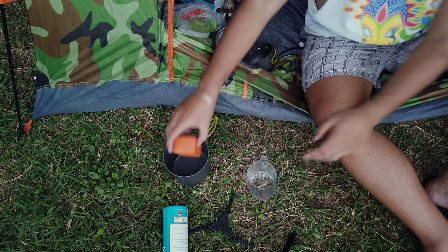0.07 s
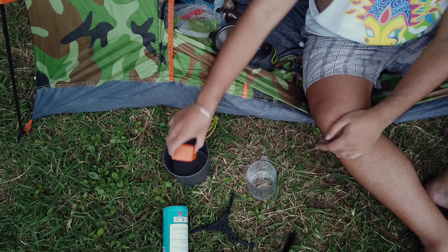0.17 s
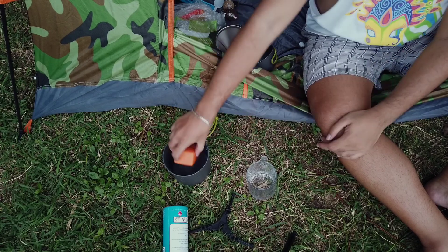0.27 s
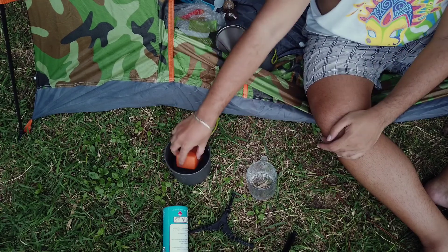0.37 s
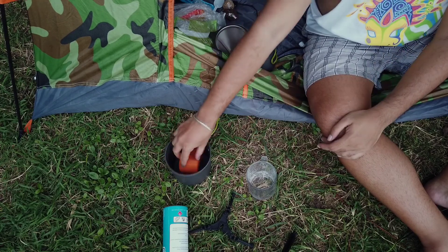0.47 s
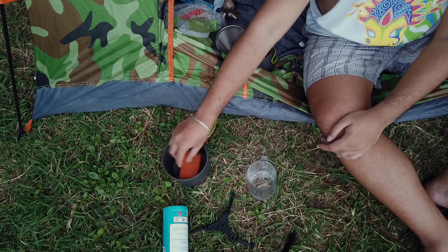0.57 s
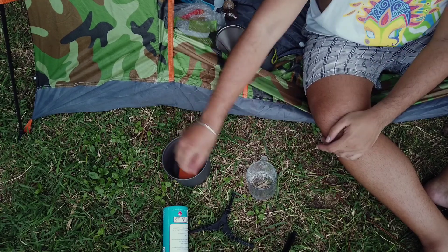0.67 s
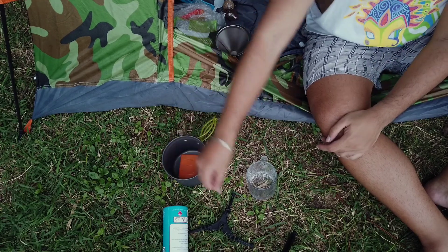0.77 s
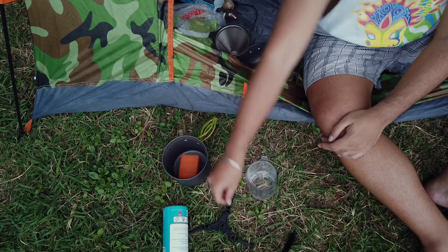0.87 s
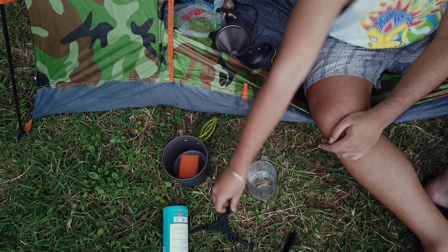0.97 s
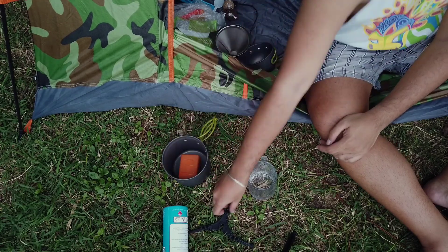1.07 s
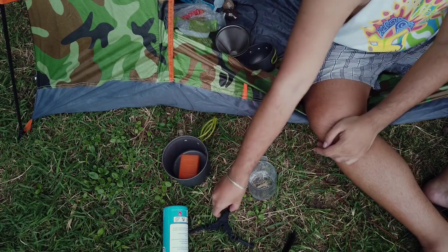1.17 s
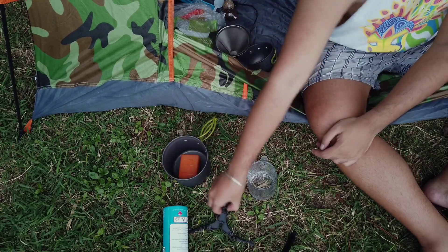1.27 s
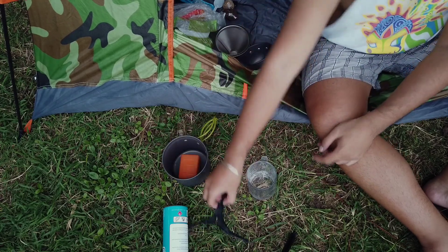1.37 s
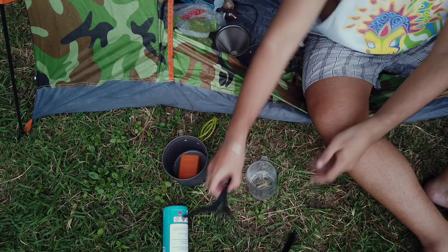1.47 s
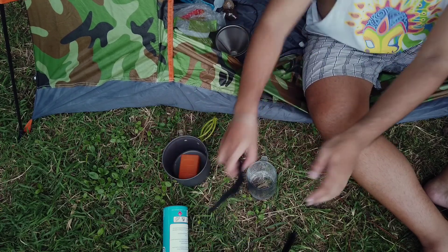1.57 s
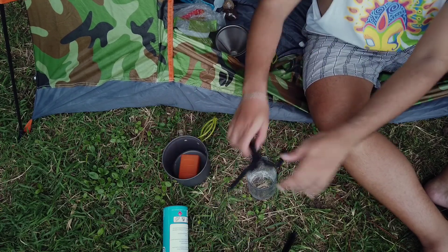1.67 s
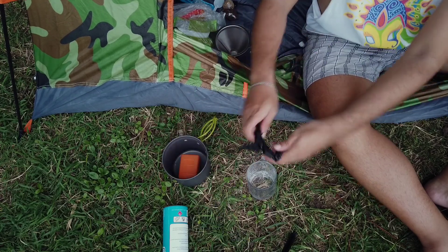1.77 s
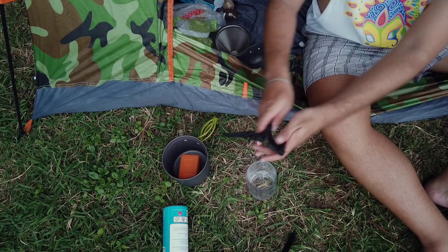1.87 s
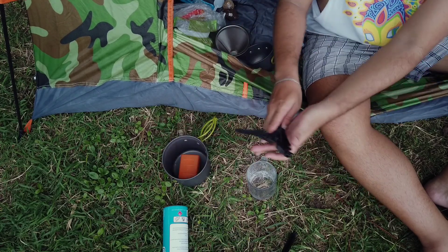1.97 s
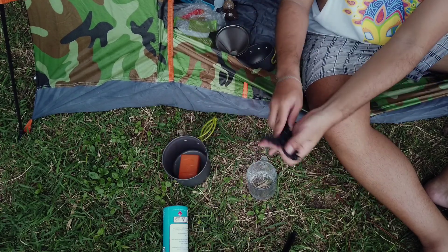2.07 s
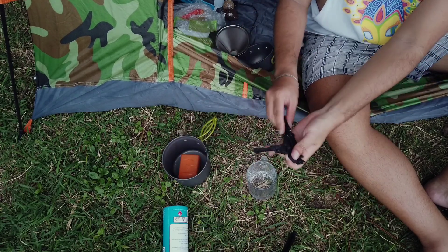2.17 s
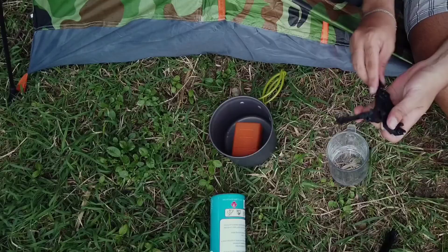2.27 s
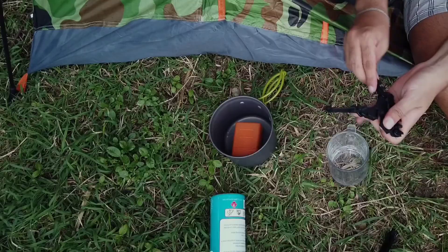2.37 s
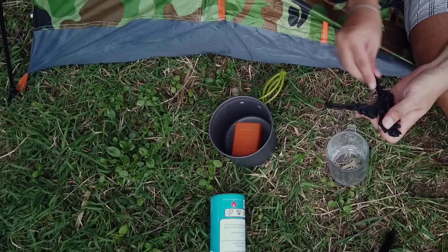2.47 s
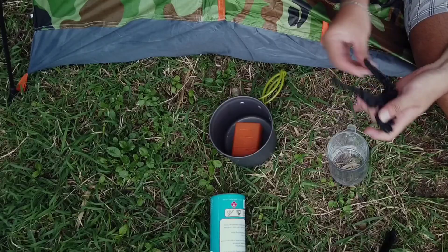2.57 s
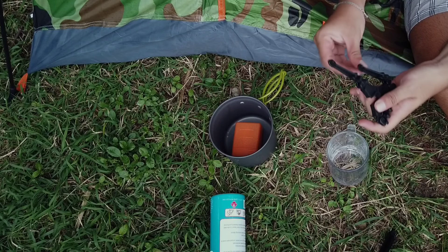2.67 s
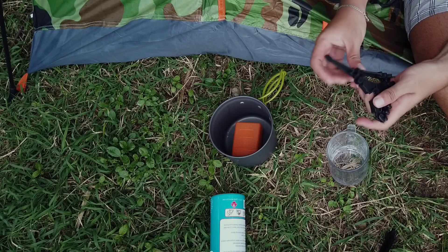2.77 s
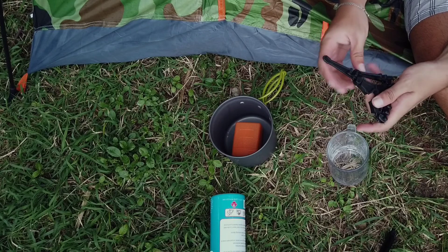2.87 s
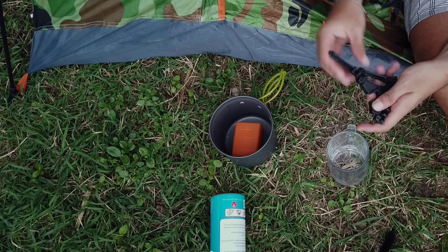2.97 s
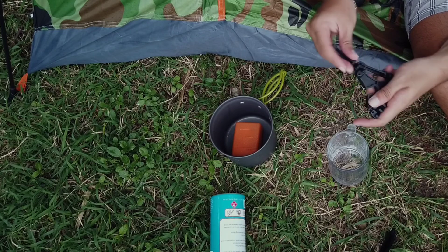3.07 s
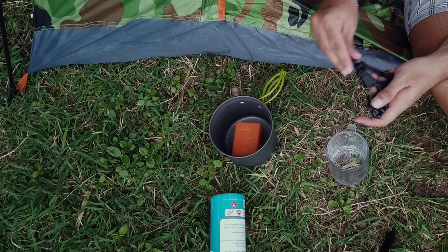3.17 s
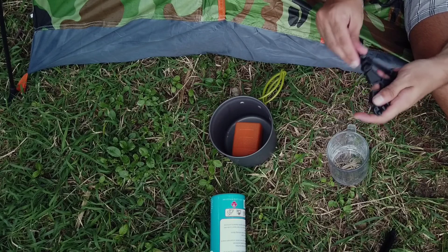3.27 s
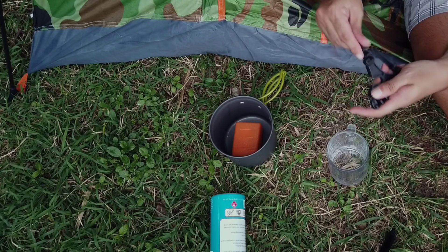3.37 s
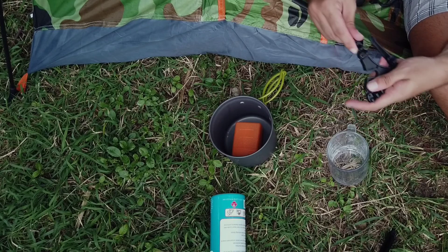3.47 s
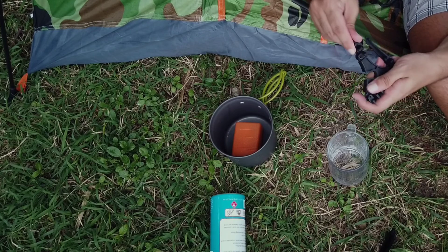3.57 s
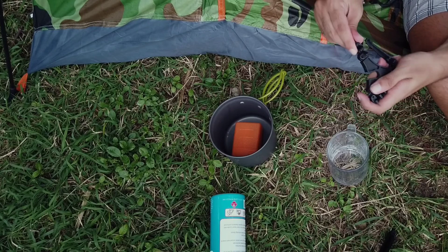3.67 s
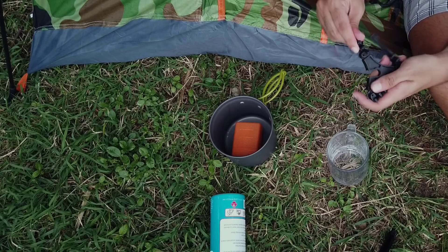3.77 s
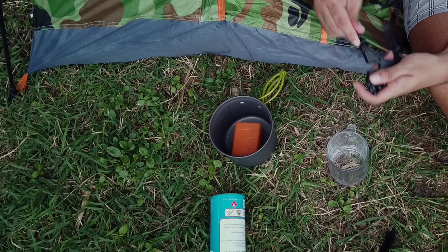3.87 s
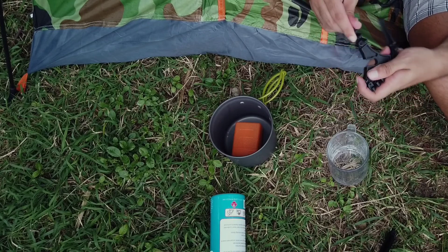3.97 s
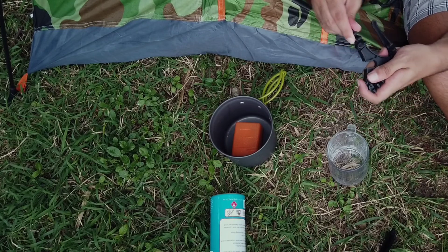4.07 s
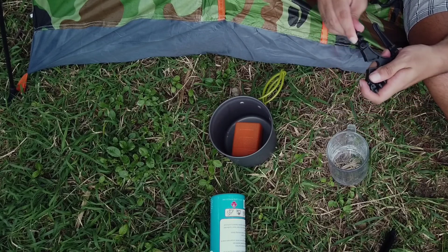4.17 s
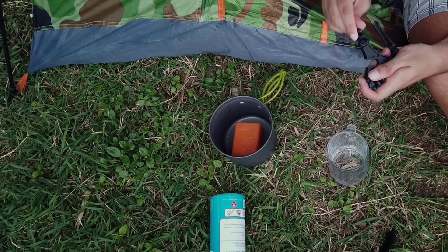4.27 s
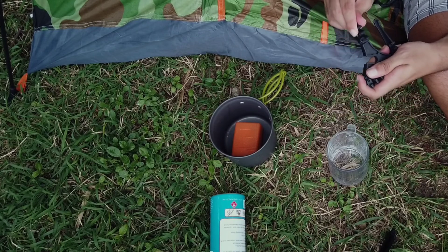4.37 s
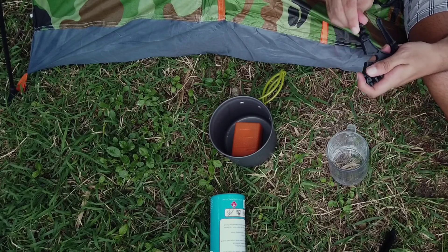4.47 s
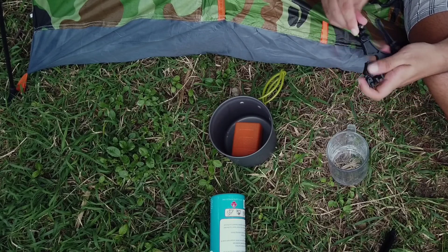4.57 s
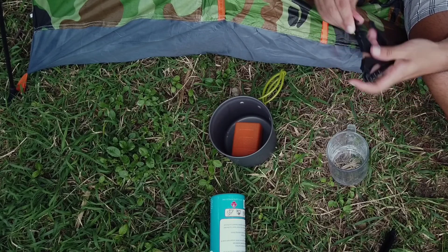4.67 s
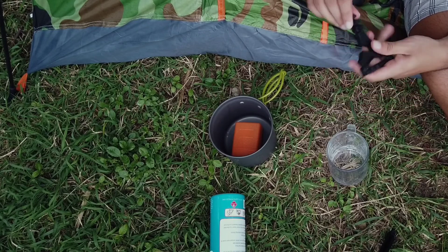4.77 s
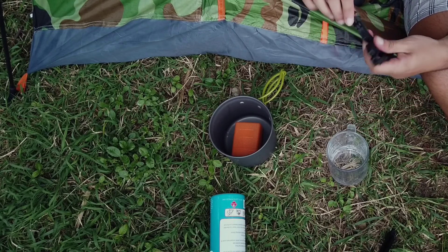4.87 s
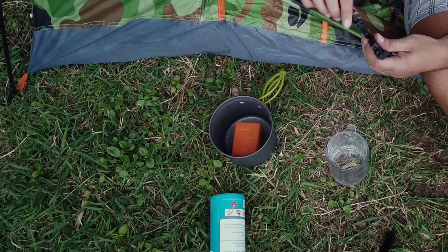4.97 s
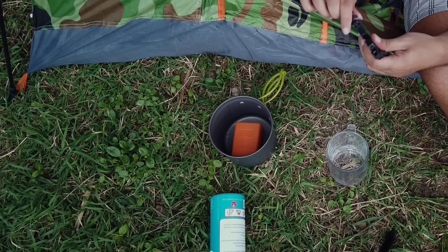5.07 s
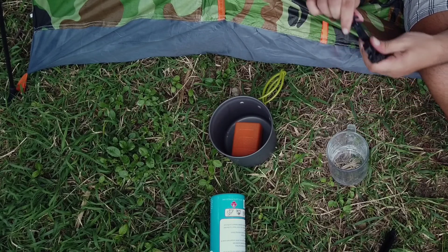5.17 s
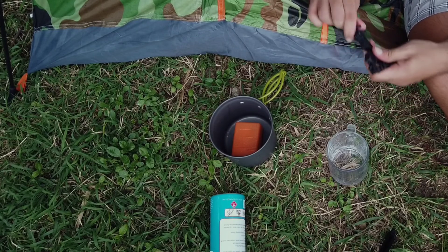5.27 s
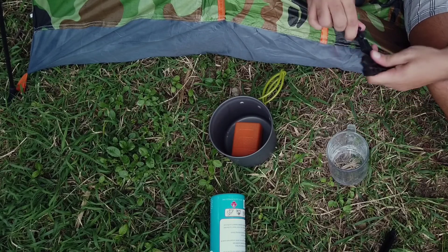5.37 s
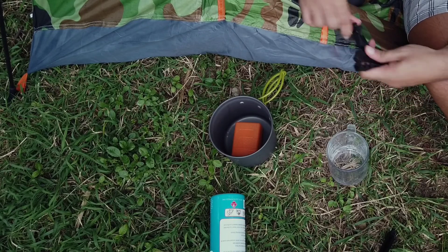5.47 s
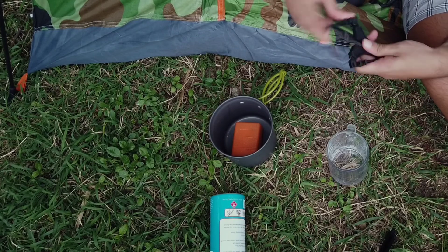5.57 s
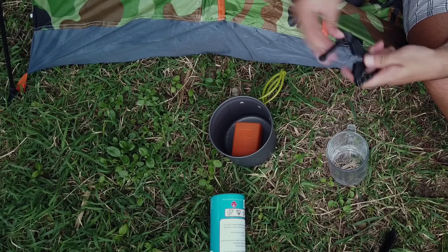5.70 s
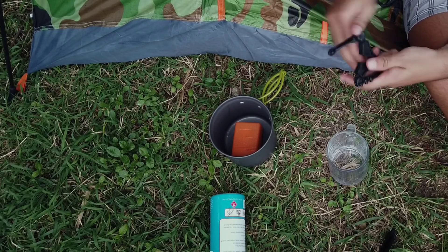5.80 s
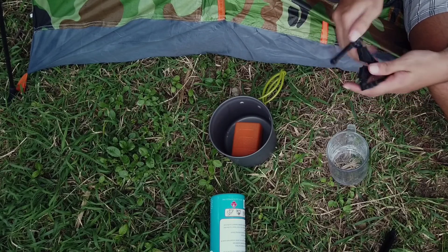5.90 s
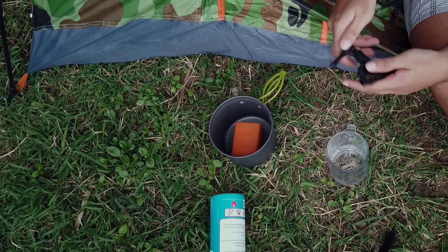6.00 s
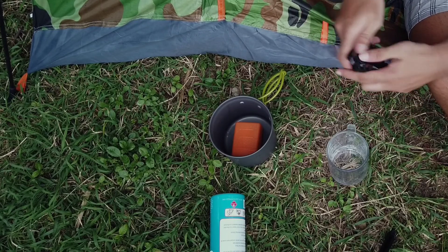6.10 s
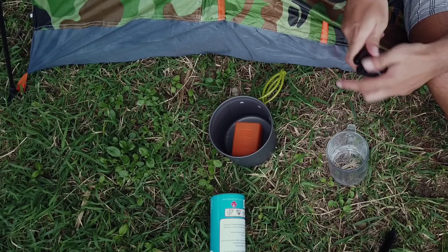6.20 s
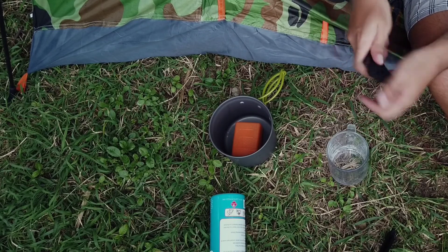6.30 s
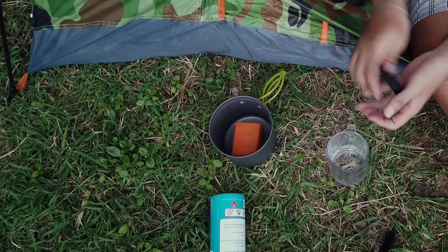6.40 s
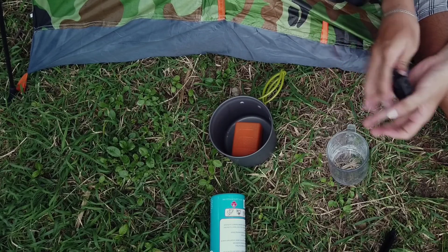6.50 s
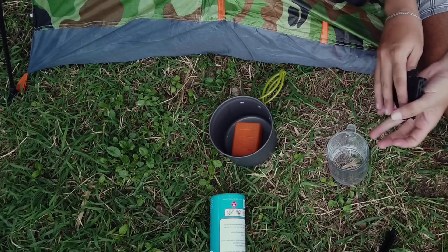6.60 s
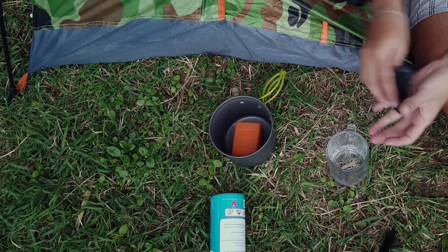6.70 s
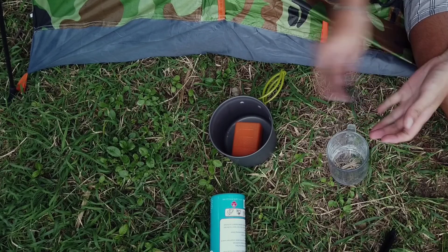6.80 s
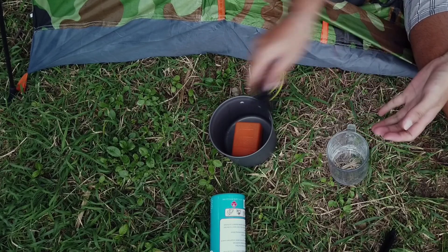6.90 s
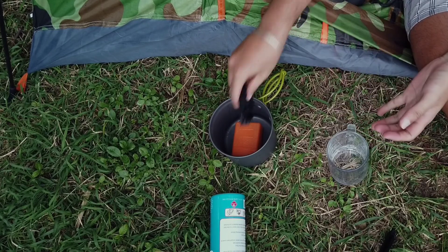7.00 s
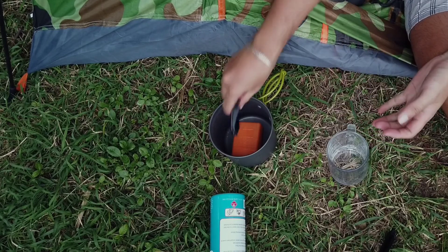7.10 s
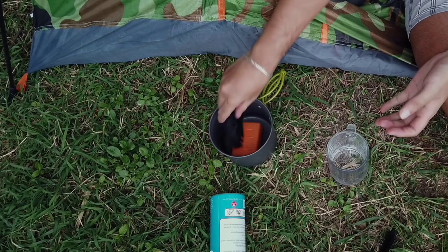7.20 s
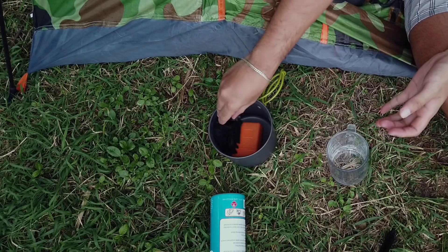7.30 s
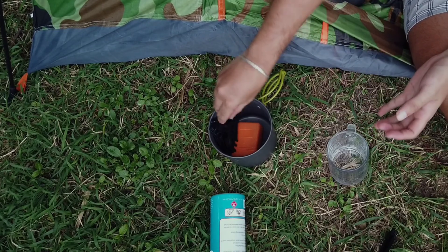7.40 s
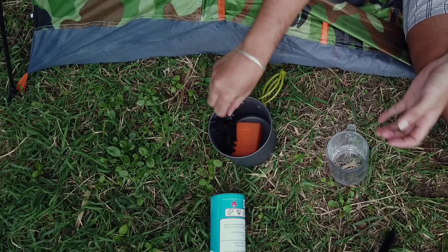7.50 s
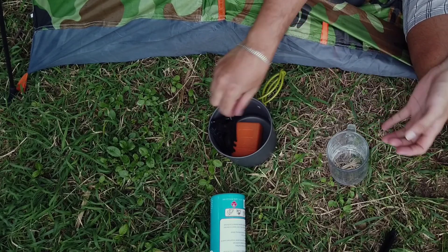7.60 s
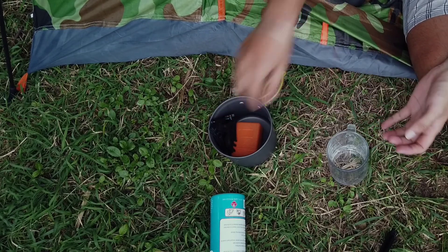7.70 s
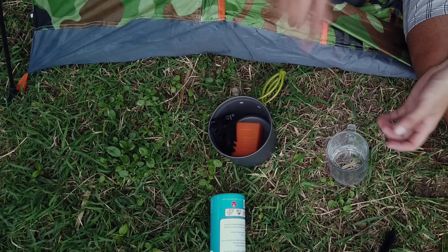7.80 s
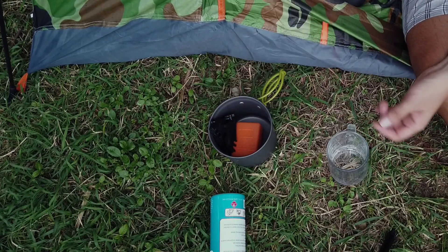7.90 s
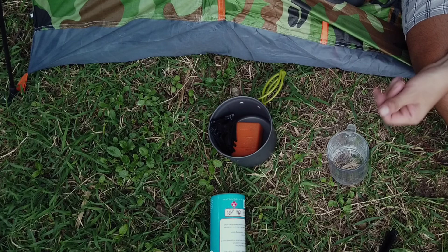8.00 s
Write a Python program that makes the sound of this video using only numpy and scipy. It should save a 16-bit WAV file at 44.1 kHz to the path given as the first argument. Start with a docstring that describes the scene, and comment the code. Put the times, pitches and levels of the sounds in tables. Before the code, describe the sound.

A plastic case clatters into a thin metal camping pot, then a folding stand clicks and rattles in, over buzzing bush-crickets and faint birds.

```python
"""A meadow beside trees, camping cookware close to a two-port microphone on the grass.
A plastic case drops into a thin metal pot; a folding stand taps a gas can, is folded and clatters in too.
Pot and can are struck sets of fading modes with noise for thud and crack; joints and scrapes are noise.
Bush-crickets are sine tooth strikes and noise pulsed by wing strokes; birds are gliding sines, some only echo.
Behind them lies the open air: coloured noise, with a far machine's hum and drone as wavering sines."""
import sys
import numpy as np
from scipy import signal
from scipy.fft import rfft, irfft, next_fast_len
from scipy.io import wavfile
from scipy.ndimage import map_coordinates

SR = 44100
rng = np.random.default_rng(int(sys.argv[2]) if len(sys.argv) > 2 else 0)


def put_to_file(sound):
    """Save the sound as 16-bit audio at rate SR, in the file named by the first command-line argument."""
    columns = np.atleast_2d(sound).T  # one column per channel
    safe = np.clip(columns, -1, 1)
    whole_steps = np.round(safe * 32767)
    wavfile.write(sys.argv[1], SR, whole_steps.astype(np.int16))


N = 354927
T = np.arange(N) / SR  # time [s]

# ringing modes of the pot wall: (pitch [Hz], level [dB], t60 [s])
POT_MODES = [(260, -10.5, 0.16), (471, -15, 0.051), (522, -8.5, .12), (545, -7.5, 0.089), (724, -9, 0.32),
             (815, -4.5, 0.15), (911, -8, 0.11), (1024.4, -1.5, 0.038), (1048, -6.5, .2), (1040, -5, 0.12),
             (1183, -8, 0.177), (1373, -5, 0.069), (1420, -8.5, 0.088), (1570, -11, 0.17), (1656, -7, .13),
             (1809, -9, 0.11), (1836, -5, 0.13), (2155, 2.5, 0.037), (2300, -9.5, 0.074), (2455, 0, 0.14),
             (2622, 1.5, 0.0645), (2730, -2.5, 0.12), (2850, 0.5, 0.13), (2990, -7, .12), (3150, -11, 0.1),
             (3560, -17, .07), (3900, -6.5, .05)]


def undb(db):
    """Decibels to gain."""
    return 10 ** (np.asarray(db) / 20)


def unit(x):
    """Scale to rms 1."""
    return x / np.sqrt(np.mean(x ** 2))


def attack(x, size=350):
    """Scale a blow so that its first milliseconds have rms 1."""
    return x / np.sqrt(np.mean(x[:size] ** 2))


def low_pass(x, order, top_hz):
    """Dull a sound above top_hz."""
    return signal.sosfilt(signal.butter(order, top_hz, fs=SR, output="sos"), x)


def colour(x, points):
    """Filter by a spectrum of (Hz, dB) points, joined on a log frequency scale."""
    hz, db = np.transpose(points)
    f = np.fft.rfftfreq(x.shape[-1], 1 / SR) + 1e-9
    gain = undb(np.interp(np.log(f), np.log(hz), db))
    return irfft(rfft(x) * gain, x.shape[-1])


def noise(points, size=N):
    """Coloured noise of rms 1."""
    white = rng.standard_normal(next_fast_len(size, True))
    return unit(colour(white, points)[:size])


def walk(rate):
    """Random drift with a spread near 1: straight lines between random values, rate of them per second."""
    knots = rng.standard_normal(1024)
    return 1.2 * map_coordinates(knots, [T * rate], order=1, mode="wrap")


def sine(hz):
    """Sine that follows a changing pitch."""
    return np.sin(2 * np.pi * np.cumsum(hz) / SR)


def fade(t, t60):
    """Exponential decay, 60 dB in t60 seconds."""
    return np.exp(-np.log(1000) * t / t60)


def dying(s, t60):
    """Starts at time s and fades."""
    return (T >= s) * fade(np.abs(T - s), t60)


def swell(middle_s, half_s):
    """A smooth rise to 1 and fall."""
    return np.exp(-((T - middle_s) / half_s) ** 2)


def add(track, s, sound):
    """Mix a sound in at time s."""
    i = max(int(s * SR), 0)
    track[i:i + len(sound)] += sound[:N - i]


def place(x, lag_ms):
    """Two microphone ports: the right one hears the source later, or earlier if the lag is negative."""
    size = next_fast_len(N + 64, True)
    f = np.fft.rfftfreq(size, 1 / SR)
    late = irfft(rfft(x, size) * np.exp(-2j * np.pi * f * lag_ms / 1000), size)
    return np.array([x, late[:N]])


def outdoors(x, t60, wet_db):
    """Diffuse scatter from tent and trees: a noise tail that builds up and dies, different at each port."""
    t = T[:SR]
    tail = rng.standard_normal((2, SR)) * fade(t, t60) * (1 - fade(t, 0.038))
    tail /= np.sqrt(np.sum(tail ** 2, axis=1, keepdims=True))
    return undb(wet_db) * signal.fftconvolve(x[None], tail, axes=1)[:, :N]


def air():
    """Distant rumble and leaf hiss, alike at both ports in the bass, with a far machine's hum and drone."""
    # open air: (frequency [Hz], density [dB per Hz])
    air_spectrum = [(20, -5.5), (50, 2.5), (80, -3), (120, -4.5), (180, -9.5), (260, -12.5), (380, -22),
                    (600, -24), (850, -26.5), (1700, -29), (2800, -32.5), (4200, -40), (9500, -45.5),
                    (12200, -36.5), (13000, -66.5)]
    # share that differs between the ports: (frequency [Hz], level [dB])
    side_share = [(25, -7), (60, -16.5), (200, -19), (400, -7), (1300, -3), (2400, -3.5), (5000, 1)]
    # swells of the low-mid rumble: (middle [s], half length [s], rise [dB])
    rumble_swells = [(0, 0.56, 12.7), (4.45, 0.49, 6.9), (6.25, 0.81, 4.5)]
    # whine of the far machine: (pitch [Hz], level [dB rms])
    whine_tones = [(511.4, -68.5), (613.7, -67)]
    # swells of the upper drone tone: (middle [s], half length [s], rise [dB])
    drone_swells = [(2.5, .6, 6.4), (7.3, 0.88, 12.6)]

    middle = noise(air_spectrum)
    side = colour(noise(air_spectrum), side_share)
    bed = undb(-46.5 + 0.19 * walk(1.3)) * (middle + side * np.array([[1], [-1]]))
    band = signal.butter(1, [200, 360], "bandpass", fs=SR, output="sos")
    low_mid = signal.sosfilt(band, bed)
    rumble_db = -3 + sum(db * swell(s, half_s) for s, half_s, db in rumble_swells)
    bed = bed + (undb(rumble_db) - 1) * low_mid

    whine = sum(undb(db + 1.9 * walk(6.2)) * sine(hz + 2.51 * walk(14)) for hz, db in whine_tones)
    # the drone is a wavering low tone and its octave; only the octave swells
    turn = 2 * np.pi * np.cumsum(54 + 4.7 * walk(8.9)) / SR
    octave_db = -58.5 + sum(db * swell(s, half_s) for s, half_s, db in drone_swells)
    drone = undb(-54.5 + 3.3 * walk(4.9)) * np.sin(turn)
    drone += undb(octave_db + 2 * walk(5.5)) * np.sin(2 * turn)
    return bed + np.sqrt(2) * (whine + drone)  # root two turns rms into peak


def whistle(length_s, pitches_hz):
    """One note that swells, glides through three pitches with a slight quaver, and dies."""
    u = np.linspace(0, 1, int(length_s * SR))
    hz = np.polyval(np.polyfit([0, .5, 1], pitches_hz, 2), u)
    hz *= 1 + .007 * walk(400)[:len(u)]
    flutter = undb(2.5 * walk(170)[:len(u)])
    return flutter * np.sin(np.pi * u) * sine(hz)


def birds():
    """Whistled glides: nearer birds are clear with an echo, far ones come only by way of the trees."""
    # runs of three quick falling chips from one bird: (start [s], level before accents [dB])
    chip_runs = [(0.186, -48), (3.51, -49.5), (3.712, -51.5), (3.937, -51.5)]
    # start, middle and end pitch of a chip [Hz]
    chip_hz = (5500, 5060, 4680)
    # accent of each chip in a run [dB]
    chip_accents = (-2, 3.5, 2.5)
    # whistles from the nearer trees: (time [s], length [s], start, middle, end [Hz], level [dB])
    near_notes = [(1.138, 0.026, 5840, 5670, 5500, -60.5), (2.356, 0.027, 5400, 5100, 4460, -59),
                  (4.696, 0.045, 5620, 5470, 5430, -55), (6.126, 0.068, 5900, 4150, 3530, -49.5),
                  (6.243, 0.0126, 2980, 4870, 6400, -46.5), (6.248, 0.059, 6900, 6590, 6270, -39.5),
                  (6.283, 0.05, 6130, 5360, 4620, -42.5)]
    # whistles from deep in the wood: (time [s], length [s], start [Hz], level [dB])
    far_notes = [(1.222, 0.098, 4500, -52), (1.46, 0.092, 3510, -52.5), (3.433, 0.026, 4010, -58),
                 (3.641, 0.022, 4650, -55.5), (3.681, .025, 4180, -63), (4.717, 0.035, 4380, -60.5),
                 (6.093, 0.035, 7360, -47), (6.37, 0.11, 4880, -52.5)]
    chip_s, chip_gap_s, far_fall_oct_per_s = .018, .031, 5.9

    near, far = np.zeros(N), np.zeros(N)
    for s, db in chip_runs:
        for k, accent_db in enumerate(chip_accents):
            add(near, s + k * chip_gap_s, undb(db + accent_db) * whistle(chip_s, chip_hz))
    for s, length_s, start_hz, middle_hz, end_hz, db in near_notes:
        add(near, s, undb(db) * whistle(length_s, [start_hz, middle_hz, end_hz]))
    for s, length_s, start_hz, db in far_notes:
        fall_oct = far_fall_oct_per_s * length_s * np.array([0, .5, 1])
        add(far, s, undb(db) * whistle(length_s, start_hz / 2 ** fall_oct))
    echo = outdoors(near, t60=.26, wet_db=-2.5) + outdoors(far, t60=.5, wet_db=0)
    return place(near, lag_ms=-0.034) + echo


def song(bouts):
    """Loudness of one cricket: each bout rises, holds with a slight waver, and falls."""
    attack_s, release_s, waver_db = 0.25, 0.18, 0.86
    held = np.zeros(N)
    for start, end, db in bouts:
        rise = np.clip((T - start) / attack_s + .5, 0, 1)
        fall = np.clip((end - T) / release_s + .5, 0, 1)
        held += undb(db) * rise * fall
    return held * undb(waver_db * walk(7))


def rasp(stroke_hz, tooth_hz):
    """Unsteady wing strokes: on each closing the tooth strikes slow down, so the wing's pitch falls."""
    # noisy ring of the wing: (frequency [Hz], level [dB])
    wing = [(8800, -47), (9600, -12), (10050, -9), (10350, 3.5), (10680, 3.5), (10850, -3.5), (11400, 4),
            (11650, -10.5), (11900, -26.5), (12350, -27), (12700, -53)]
    stroke_fall_hz, tooth_jitter_hz = 1400, 130
    rasp_db, stroke_depth = -5, .8

    phase = np.cumsum(stroke_hz * (1 + .01 * walk(9))) / SR  # in strokes
    through_stroke = (phase + .5) % 1 - .5
    teeth = sine(tooth_hz - stroke_fall_hz * through_stroke + tooth_jitter_hz * walk(260))
    throb = np.exp(stroke_depth * np.cos(2 * np.pi * phase))
    return unit((teeth + undb(rasp_db) * noise(wing)) * throb)


def crickets():
    """Two near bush-crickets buzz through the grass; a lower one is far off and another rasps briefly."""
    # bouts of song, one list for each near cricket: (start [s], end [s], level [dB])
    near_bouts = [
        [(-.2, 1.29, -59.5), (1.56, 3.45, -57.5), (3.8, 7.9, -60)],
        [(-.2, .4, -55.5), (1.78, 2.3, -56), (2.75, 3.85, -60), (3.88, 4.45, -52.5), (5.54, 6.1, -53),
         (7.07, 7.65, -54)],
    ]
    # wing strokes per second of each near cricket [Hz]
    stroke_rates = (110.8, 119.2)
    # tooth strikes per second in mid-stroke of each near cricket [Hz]
    tooth_rates = (11200, 10950)

    first, second = (song(bouts) * rasp(stroke_hz, tooth_hz)
                     for bouts, stroke_hz, tooth_hz in zip(near_bouts, stroke_rates, tooth_rates))
    near = place(first, lag_ms=-0.0054) + place(second, lag_ms=-0.073)
    near += outdoors(first + second, t60=.12, wet_db=-1)

    far_band = [(6200, -38.0), (7100, -14.0), (7400, -1.0), (7520, 2.0), (7700, -4.0), (8400, -26.5)]
    far = undb(-74 + 2 * walk(7.8)) * np.array([noise(far_band), noise(far_band)])

    burst = noise([(5500, -35.0), (7000, 5.0), (8800, 7.5), (10500, 2), (13200, -7.0), (14500, -40)])
    burst *= undb(-60 + 3 * walk(70)) * swell(4.235, 0.06)
    return near + far + place(burst, lag_ms=0.02)


def ring(modes, t, scatter_db, detune):
    """One strike on a set of modes; each spot weights them differently and the load bends their pitch."""
    hz, db, t60 = np.transpose(modes)[:, :, None]
    weight, bend, sign = rng.standard_normal((3, len(modes), 1))
    partials = np.sin(2 * np.pi * hz * (1 + detune * bend) * t) * fade(t, t60)
    gains = np.sign(sign) * undb(db + scatter_db * weight)
    return attack(np.sum(gains * partials, axis=0))


def tick(t, t60, top_hz=17000):
    """Hard contact: a bright, fading noise burst that stands for dense high modes."""
    # tick of contact: (frequency [Hz], level [dB])
    tick_spectrum = [(1500, -25), (3200, -8), (4300, -12), (5200, -4), (6100, -3), (7100, 1), (8000, 1.5),
                     (9600, -6), (11500, -9), (13000, -13), (16000, -28)]
    burst = noise(tick_spectrum, size=len(t)) * fade(t, t60)
    return attack(low_pass(burst, 4, min(top_hz, .45 * SR)))


def favour(x, hz, lift_db):
    """The spot touched brings out one pitch: a resonant peak is added."""
    return x + (undb(lift_db) - 1) * signal.lfilter(*signal.iirpeak(hz, 9, fs=SR), x)


def stand():
    """The stand taps the gas can as it is lifted; its joints click and scrape as the legs fold."""
    # modes of the gas can: (pitch [Hz], level [dB], t60 [s])
    can_modes = [(982, -1.5, 0.13), (1160, 1.5, 0.021), (1380, 0, 0.23), (1790, -9, 0.2), (2040, -5.5, .04),
                 (2283, -1, 0.15), (2295, -17, 0.85), (1900, -6, .1), (5440, -5.5, .08), (2570, 3.5, 0.16),
                 (4600, -6, .04), (4860, 0, 0.04), (5770, 2, 0.037), (8080, 3.5, 0.057), (8300, -1, 0.077)]
    # clicks of the joints: (time [s], level [dB], pitch of the snap [Hz])
    joint_clicks = [(2.492, -49.5, 5200), (2.941, -50.5, 4384), (4.589, -57, 1703), (5.519, -55, 2500),
                    (6.305, -43.5, 2770), (6.636, -43.5, 2300)]
    snap_spectrum = [(400, -2), (1200, -3.5), (2600, -2), (5500, 4), (8000, -18), (13000, -30)]
    scrape_spectrum = [(700, -7.0), (950, 0.5), (1120, 5.5), (1350, -13), (1700, -4), (2600, -15), (4000, -43.5)]

    tap, clicks, t = np.zeros(N), np.zeros(N), T[:SR // 2]
    can = ring(can_modes, t, scatter_db=1, detune=.001)
    add(tap, 1.5355, undb(-29) * can + undb(-37) * tick(t, t60=0.14, top_hz=11300))
    for s, db, hz in joint_clicks:
        snap = noise(snap_spectrum, size=len(t)) * fade(t, 0.03)
        add(clicks, s, undb(db) * attack(favour(snap, hz, lift_db=15)))
    clicks += undb(-49) * noise(scrape_spectrum) * dying(2.721, t60=0.34)
    scatter = outdoors(tap + clicks, t60=.15, wet_db=-12)
    return place(tap, lag_ms=-0.08) + place(clicks, lag_ms=0.081) + scatter


def tonk(t, pitch, top_hz, build_cycles):
    """The flat base struck squarely: clear modes that build up over their first cycles."""
    # base of the pot: (pitch [Hz], level [dB], t60 [s])
    base_modes = [(500, -10, 0.078), (1000, -0.5, .065), (1600, -8, 0.11), (1767, 9, 0.021)]
    out = np.zeros(len(t))
    for hz, db, t60 in base_modes:
        build_up = 1 - np.exp(-t * hz / build_cycles)
        out += undb(db) * np.sin(2 * np.pi * hz * pitch * t) * fade(t, t60) * build_up
    return low_pass(out, 4, top_hz)


def chatter(x, db):
    """Loose parts skitter after a contact: a few ever weaker repeats at uneven gaps."""
    out, late = x.copy(), 0
    for k, gap_s in enumerate(rng.uniform(.003, .012, size=4)):
        late += int(gap_s * SR)
        out[late:] += undb(db - 2.39 * k) * x[:-late]
    return out


def skitter(strength, rate, spread_db, t60, count=3):
    """Tiny uneven contacts at random moments, shared among a few edges that each ring briefly."""
    # ring of an edge: (frequency [Hz], level [dB])
    edge_spectrum = [(150, -12.5), (400, -10.5), (800, -3.5), (1250, 1.5), (2000, -6), (2800, -4),
                     (3600, -15), (4500, -15.5), (7500, -25), (11500, -25), (15000, -38.5)]
    out, t = np.zeros(N), T[:SR // 20]
    for _ in range(count):
        moments = rng.random(N) < rate / count / SR
        touches = moments * undb(spread_db * np.clip(rng.standard_normal(N), -2, 2))
        edge = noise(edge_spectrum, size=len(t)) * fade(t, t60)
        out += signal.oaconvolve(unit(touches) * strength, edge / np.linalg.norm(edge))[:N]
    return out / np.sqrt(count)


def blow_body(t, corner_hz, spot_hz, spot_db, thud_db, lasting_db):
    """Ring of the wall, crowded short modes of pot and contents, and the thud of the pot on the turf."""
    # crowded short-lived modes: (frequency [Hz], level [dB])
    shell_spectrum = [(60, -23.5), (150, -22.5), (235, -17), (370, -14), (520, -17.5), (670, -14),
                      (1000, 1), (1250, -18.5), (1750, -9.5), (2700, -21), (3400, -0.5), (4400, 0),
                      (9000, -44)]
    # thud on the turf: (frequency [Hz], level [dB])
    thud_spectrum = [(90, -23.5), (160, -6), (245, 3), (340, -4.5), (530, -1.5), (800, -12.5),
                     (2000, -50.5)]
    shell = attack(noise(shell_spectrum, size=len(t)) * fade(t, .03))
    # grass and contents take part of the ring at once; the rest lasts
    damping = fade(t, 0.042) + undb(lasting_db)
    wall = attack(damping * ring(POT_MODES, t, scatter_db=2, detune=.006))
    body = favour(undb(2.5) * wall + shell, spot_hz, spot_db)
    body = attack(low_pass(body, 3, corner_hz))
    thud = attack(noise(thud_spectrum, size=len(t)) * fade(t, 0.058) * (1 - fade(t, 0.0067)))
    return chatter(body + undb(thud_db) * thud, db=lasting_db)


def crack(t, db):
    """Hard contact cracks, brighter when louder, then the wall's crowded high overtones die away."""
    # a crack of -52.5 dB reaches 3725 Hz; the reach rises an octave for every 11 dB
    reach_hz = 3725 * 2 ** ((db + 52.5) / 11)
    shimmer = tick(t, 0.33, min(reach_hz, 10430))
    return undb(db) * (tick(t, .009, reach_hz) + undb(-18.5) * shimmer)


def slides():
    """The case slides down the wall of the pot: friction noise keeps the wall's modes stirred."""
    # slides: (middle [s], half length [s], level [dB], favoured pitch [Hz])
    slide_table = [(0.1, 0.15, -52, 808), (0.511, .07, -54, 566.5)]
    t = T[:SR // 3]
    wall = ring(POT_MODES, t, scatter_db=2, detune=.005) * fade(t, 0.05)
    rubbed = unit(signal.fftconvolve(rng.standard_normal(N), wall)[:N])
    out = np.zeros(N)
    for s, half_s, db, spot_hz in slide_table:
        out += undb(db) * swell(s, half_s) * unit(favour(rubbed, spot_hz, lift_db=12))
    return out


def pot():
    """Case, then stand, bump the rim, drop in and rattle to rest: each blow rings the pot."""
    # blows: (time [s], level [dB], top of the contact's range [Hz], crack [dB re the blow],
    # pitch favoured by the spot struck [Hz], its lift [dB], thud [dB re the blow],
    # lasting share of the ring and level of the chatter [dB])
    blow_table = [(.002, -32.5, 2540, -22.5, 1040, 12, -22, -17),
                  (.058, -32, 2600, -20.5, 870, 17, -6.5, -13),
                  (0.069, -45, 2700, -10.5, 2200, 14, -17, -16), (0.081, -46, 2900, -8, 840, 4, -8, -27),
                  (0.113, -44, 2400, -12.5, 1190, 16, -17, -28),
                  (0.13, -32.5, 2900, -20, 1020, 30, -13, -32),
                  (0.178, -40.5, 2300, -14.5, 805, 22, -14, -18),
                  (0.431, -38, 3250, -22, 574, 20.5, -9.5, -6), (.446, -42, 3420, -16, 570, 17, -8, -20),
                  (0.484, -44, 1400, -11.5, 553, 27.5, -5, -13),
                  (.553, -40, 2210, -37, 566, 12.5, -28, -30),
                  (0.56, -42, 2600, -12.5, 573, 19, -15.5, -7.5),
                  (0.635, -29.5, 1520, -36.5, 970, 11.5, -22, -3),
                  (.6476, -14.5, 2440, -16.5, 2380, 5.5, -16, -18.5),
                  (.676, -21.5, 2130, -25.5, 1600, 0, -17, -11.5),
                  (0.7034, -23.5, 2100, -23.5, 1590, 0.5, -15, -6),
                  (0.7151, -9, 3760, -14.5, 1520, 14, -21, -14),
                  (0.7203, -15.5, 3100, -22.5, 2713, 15, -15, -9),
                  (0.7248, -18.5, 2000, -34, 896, 15, -8.5, -4),
                  (0.7395, -18.5, 2940, -16, 1760, 8.5, -27, -13),
                  (0.7536, -24, 3100, -20.5, 900, 10.5, -13, -6.5),
                  (.772, -22, 1500, -26.5, 885, 12, -15, -13.5), (0.78, -27, 3000, -23, 2800, 9, -12, -11),
                  (0.858, -39.5, 2310, -31, 927, 14, -21, -38),
                  (7.343, -37, 2220, -15.5, 950, 6, -14, -1.5), (7.3853, -15, 3420, -13, 2470, 3, -19, -25),
                  (7.393, -24, 2400, -18.5, 815, 8, -17, -7), (7.4029, -13, 3030, -13, 2080, 9.5, -18, -15),
                  (7.4163, -19.5, 2580, -29.5, 1800, 7, -13, -18),
                  (7.428, -25, 2100, -25, 990, 11.5, -26, -16), (7.441, -31.5, 2500, -19, 1050, 11, -5, -4),
                  (7.4564, -27, 2880, -17, 1130, 6.5, -11, -13), (7.484, -33, 2450, -17, 1050, 8, -8, -16),
                  (7.508, -45, 2600, -8, 1050, 5, -10, -16), (7.536, -27.5, 3730, -5.5, 810, 8, -12, -17.5),
                  (7.583, -40, 1590, -9.5, 1110, 0, -6, -6), (7.665, -45, 1870, -22, 760, 11, -7.5, -3.5)]
    # square landings on the base: (time [s], level [dB], pitch ratio, top [Hz], build-up [cycles])
    landing_table = [(0.6473, -3, 1.0, 3230, 2.47), (7.3844, -4.5, 1.04, 1230, 0.83)]
    # thin legs of the stand left ringing by a touch: (time [s], pitch [Hz], level [dB], t60 [s])
    leg_rings = [(7.344, 1980, -38, 0.39), (7.456, 6600, -30, .05), (7.536, 3650, -35, 0.24),
                 (7.536, 6370, -31, 0.037), (7.536, 6860, -17.5, 0.012), (7.535, 8760, -29.5, 0.051),
                 (7.667, 1926, -43, 0.13)]
    # edges scrape and skitter on the wall after each drop: (start [s], level [dB], t60 [s])
    rattle_table = [(.654, -33, 0.32), (.722, -24.5, 0.26), (7.392, -25, 0.19), (7.541, -41, .2)]

    walls, cracks, t = np.zeros(N), np.zeros(N), T[:SR // 3]
    for s, db, corner_hz, crack_db, spot_hz, spot_db, thud_db, lasting_db in blow_table:
        add(walls, s, undb(db) * blow_body(t, corner_hz, spot_hz, spot_db, thud_db, lasting_db))
        add(cracks, s, crack(t, db + crack_db))
    for s, db, pitch, top_hz, build_cycles in landing_table:
        add(walls, s, undb(db) * tonk(t, pitch, top_hz, build_cycles))
    for s, hz, db, t60 in leg_rings:
        add(walls, s, undb(db) * np.sin(2 * np.pi * hz * t) * fade(t, t60))
    restless = sum(undb(db) * dying(s, t60) for s, db, t60 in rattle_table)
    walls += skitter(restless, rate=230, spread_db=5, t60=.016)
    walls += slides()
    # short waves scatter more than the low ring does
    scatter = outdoors(walls, t60=0.33, wet_db=-24.0) + outdoors(cracks, t60=0.049, wet_db=1.5)
    return place(walls + cracks, lag_ms=-0.11) + scatter


def scene():
    """The meadow all round, the cookware close by."""
    return air() + birds() + crickets() + stand() + pot()


def record(dry):
    """Peaks beyond full scale are clipped, then the treble above 16 kHz is cut."""
    top_cut = signal.ellip(8, .2, 70, 16000, fs=SR, output="sos")
    return signal.sosfilt(top_cut, np.clip(dry, -1, 1))


dry = scene()
out = record(dry)
put_to_file(out)
```